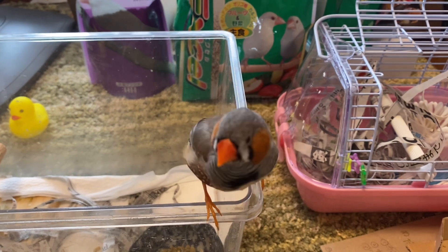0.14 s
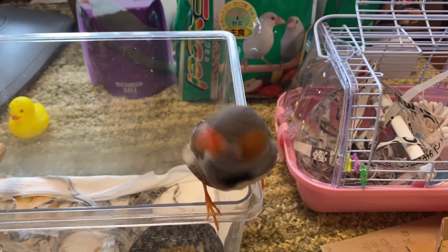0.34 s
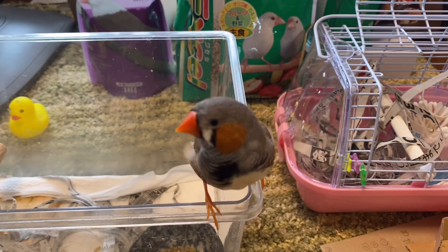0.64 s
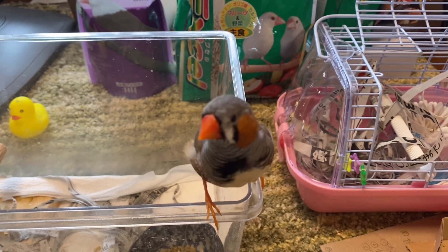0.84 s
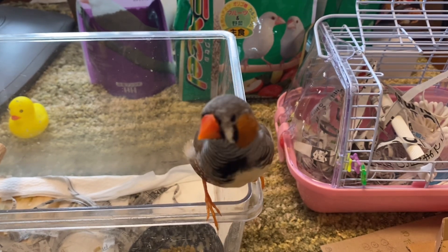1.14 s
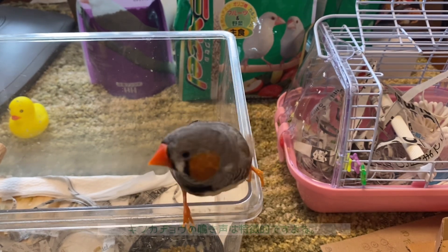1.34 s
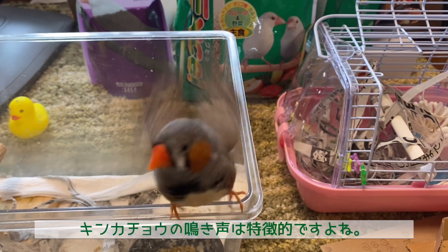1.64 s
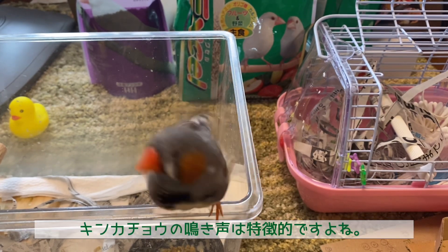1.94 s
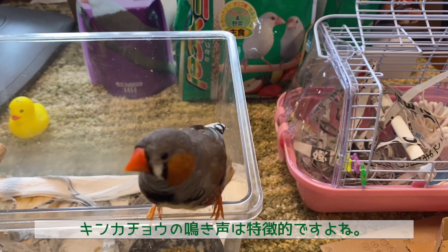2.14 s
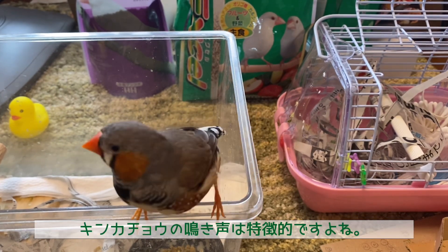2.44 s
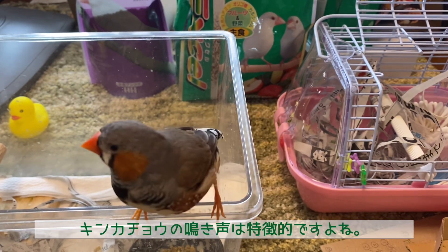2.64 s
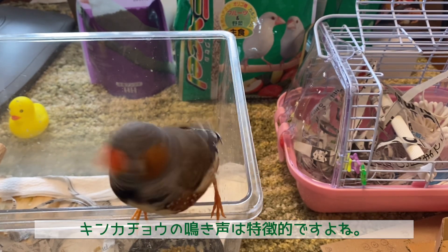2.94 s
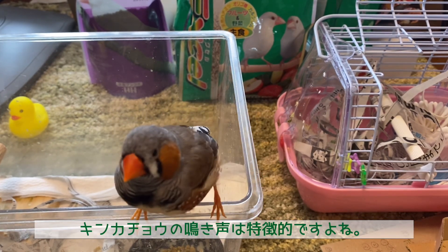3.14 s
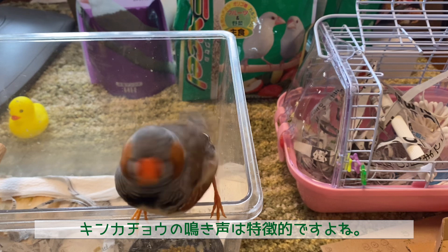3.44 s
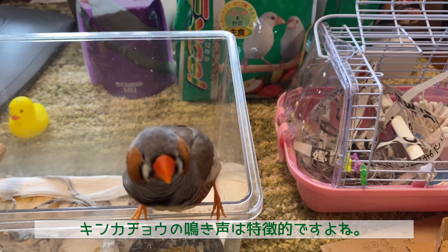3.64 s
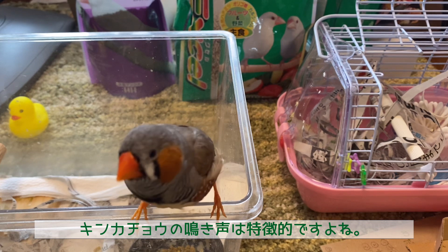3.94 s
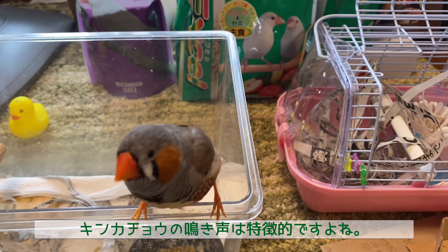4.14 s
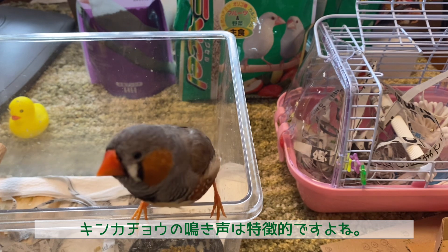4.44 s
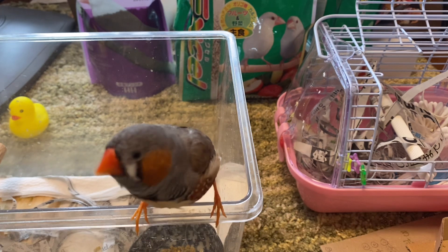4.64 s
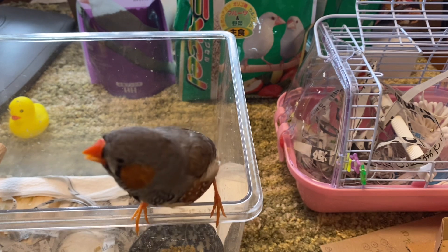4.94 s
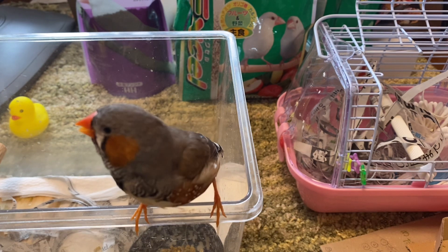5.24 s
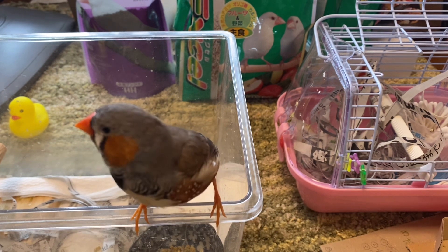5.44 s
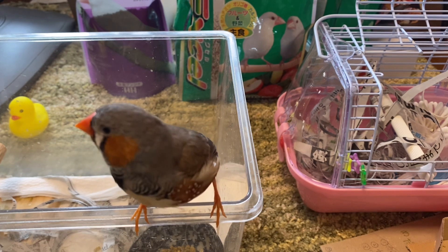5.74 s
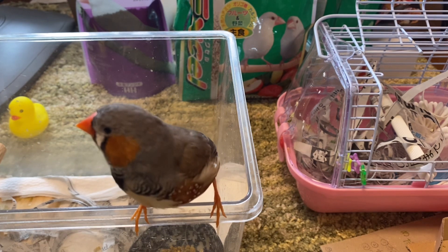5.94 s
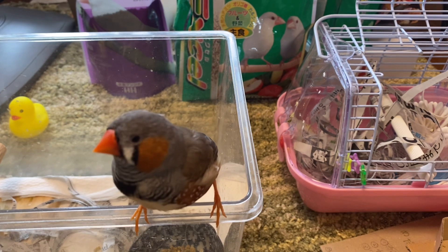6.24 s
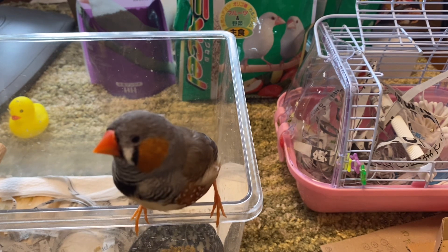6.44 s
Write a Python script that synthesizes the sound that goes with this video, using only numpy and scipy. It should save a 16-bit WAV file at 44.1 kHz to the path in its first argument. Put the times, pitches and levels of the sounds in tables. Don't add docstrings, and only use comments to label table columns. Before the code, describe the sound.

A pet finch very close to a stereo microphone in a quiet room with a low machine hum and faint hiss. A call's tail fades, a tiny buzzy note follows, then claws scratch and snap on a plastic tub with soft wing thumps. After a pause with faint feather ruffles come three thin spaced chirps, a short nasal note running into a loud long nasal call, and finally one more tiny buzz.

```python
import sys
import numpy as np
from scipy import signal
from scipy.fft import rfft, irfft, next_fast_len
from scipy.io import wavfile
from scipy.ndimage import uniform_filter1d

SR = 44100
rng = np.random.default_rng(int(sys.argv[2]) if len(sys.argv) > 2 else 0)


def gain_from_db(level_db):
    decades = np.asarray(level_db, float) / 20
    return 10 ** decades


def inscribe(sig):
    pcm = np.round(np.clip(np.atleast_2d(sig).T, -1, 1) * 32767)
    wavfile.write(sys.argv[1], SR, pcm.astype(np.int16))


N = 290619
TIME = np.arange(N) / SR
PADDED = next_fast_len(N)
BINS = np.maximum(np.fft.rfftfreq(PADDED, 1 / SR), 1)


def at_hz(points, hz, axis=1):
    points = np.array(points)
    return np.interp(np.log(hz), np.log(points[:, 0]), points[:, axis])


def rms_one(x):
    return x / np.sqrt(np.mean(x ** 2) + 1e-20)


def wobble(size, hz, count=1):
    sos = signal.butter(4, hz, fs=SR, output="sos")
    run_in = int(2 * SR / hz)
    drift = signal.sosfilt(sos, rng.standard_normal((count, size + run_in)))
    return np.squeeze(rms_one(drift[:, run_in:]))


def band(x, low_hz, high_hz):
    return signal.sosfilt(signal.butter(3, [low_hz, high_hz], "band", fs=SR, output="sos"), x)


# [hz, likeness]
PORT_LIKENESS = [(60, 1), (200, 0.8), (500, 0.13), (3000, .3), (4800, 0.15), (6900, 0.267), (10000, 0.27),
                 (15000, 0.37)]
# [hz, left_minus_right_db]
NOISE_PAN = [(40, 3), (100, -5.5), (200, -1), (500, -0.2), (4800, -0.5), (7000, 1)]


def stereo_noise(gain):
    mid, side = rfft(rng.standard_normal((2, PADDED)))
    alike = np.clip(at_hz(PORT_LIKENESS, BINS), 0, 1)
    pan = gain_from_db(at_hz(NOISE_PAN, BINS) / 2)
    mid, side = mid * np.sqrt(1 + alike), side * np.sqrt(1 - alike)
    both = irfft(gain * np.array([(mid + side) * pan, (mid - side) / pan]), PADDED)[:, :N]
    return both / np.sqrt(np.mean(both.mean(0) ** 2))


# [start_s, length_s, peak_db]
FEATHER_RUFFLES = [
    (0, .1, -80),
    (1.22, 0.066, -81),
    (2.863, .1, -71.5),
    (2.95, 0.052, -68),
    (3.05, 1.16, -77),
    (3.672, 0.23, -73),
    (5.0, 0.36, -76),
    (5.45, 0.86, -79.5),
    (6.45, .3, -77),
]
STILL_AIR_DB = -86


def stirred_air():
    rise_db_per_s, fall_db_per_s = 327, 110
    air_db = np.full(N, float(STILL_AIR_DB))
    for start, length, peak_db in FEATHER_RUFFLES:
        before_s = np.maximum(start - TIME, 0)
        after_s = np.maximum(TIME - start - length, 0)
        away_db = rise_db_per_s * before_s + fall_db_per_s * after_s
        air_db = np.maximum(air_db, peak_db - away_db)
    return air_db


# [hz, level_db_per_hz]
HUM_SPECTRUM = [(12, -61), (20, -28.5), (54, -3), (114, -4), (131, -3.5), (146, -36.5), (172, -10.5),
                (205, -20.5), (232, -15), (273, -20.5), (419, -32.5), (468, -23), (515, -31.5),
                (634, -30.5), (900, -30), (1170, -84), (1980, -120)]
# [hz, level_db_per_hz]
HISS_SPECTRUM = [(530, -39), (900, -15), (991, -5.5), (1100, -2), (1390, -9.5), (1930, -7), (2380, -10),
                 (2620, -3.5), (2940, -9), (3860, -13.5), (4720, -5), (5150, -12.5), (7280, -18),
                 (8330, -26.5), (9000, -73), (11700, -67.5), (19800, -120)]


def background():
    hum_db, hiss_db = -46.5, -65
    top_at_still_db, top_steeper = -104, 1.9
    air_db = stirred_air()
    hum_swell, hiss_swell = gain_from_db(.8 * wobble(N, 3, count=2))
    hum = gain_from_db(hum_db) * hum_swell * stereo_noise(gain_from_db(at_hz(HUM_SPECTRUM, BINS)))
    hiss = gain_from_db(hiss_db) * hiss_swell * stereo_noise(gain_from_db(at_hz(HISS_SPECTRUM, BINS)))
    white = stereo_noise(1)
    air = rms_one(band(white, 9700, 15000)) + 1.8 * rms_one(band(white, 3500, 7460))
    top_db = top_at_still_db + top_steeper * (air_db - STILL_AIR_DB)
    top = gain_from_db(top_db) * rms_one(band(white, 13500, 15000))
    return hum + hiss + gain_from_db(air_db) * air + top


def resonance(hz, centre_hz, width_hz):
    return 1 / (1 + 1j * (hz - centre_hz ** 2 / hz) / width_hz)


# [start_s, pitch_step_share, level_step_db]
REGISTER_SHIFTS = [
    (4.751, -0.038, 5),
    (4.882, .075, 1.5),
    (4.944, .05, 2.5),
    (5.141, -0.064, 2),
]
# [time_s, pitch_kink_share, length_s, extra_roughness (0-1), level_jump_db]
VOICE_CATCHES = [(4.699, -0.012, .005, 0.08, -2), (4.747, 0.063, 0.0023, .15, 4),
                 (4.881, 0.077, 0.0056, 0.37, 1.5), (4.966, 0.051, 0.0069, 0, 0),
                 (5.003, -0.02, 0.03, 0, 0.3), (5.019, 0.044, 0.0064, 0, 1), (5.045, 0.035, 0.005, 0, -1.5),
                 (5.075, .05, .006, 0, -3.5), (5.128, -0.0047, 0.005, 0, 1.5),
                 (5.182, 0.019, 0.0073, 0.06, 2.5), (5.201, 0.044, 0.0028, 0.7, 1.5)]
# [hz, level_db]
THROAT_COLOUR = [(400, 4.5), (800, 8), (1600, 5.5), (2400, 7.5), (3200, 8), (4000, 4.5), (4800, 5),
                 (5600, -4.5), (7000, -5.5), (9600, -2.5), (10500, -1), (12200, -7), (14200, -6),
                 (15600, -6)]
# [centre_hz, width_hz]
SIDE_RESONANCES = [(850, 770), (6900, 1750), (10500, 1200), (15500, 400)]


def note(rows, beak, roughness, sides_db, full_db):
    s, *columns = np.transpose(rows)
    span = slice(round(s[0] * SR), round(s[-1] * SR))
    t = TIME[span]
    pitch, level_db = [np.interp(t, s, c) for c in columns]
    for at, step, step_db in REGISTER_SHIFTS:
        shifted = (at > s[0]) * (1 + np.tanh((t - at) / 0.0005)) / 2
        pitch, level_db = pitch * (1 + step * shifted), level_db + step_db * shifted
    below_db = np.maximum(max(full_db, level_db.max()) - level_db, 0)

    beak_hz, width_hz, follows, opens, flare = beak
    flare = flare * np.exp((s[0] - t) / 0.0095)
    beak_hz = beak_hz * (pitch / np.median(pitch)) ** follows
    beak_hz = beak_hz * gain_from_db(-opens * below_db) * (1 + flare)

    rough = np.clip(roughness[0] + roughness[1] * below_db / 20, 0, .7)
    for at, kink, length, harsh, jump_db in VOICE_CATCHES:
        bump = np.exp(-((t - at) / length) ** 2)
        pitch = pitch * (1 + kink * bump)
        rough, level_db = rough + harsh * bump, level_db + jump_db * bump
    pitch = pitch * (1 + .005 * wobble(len(t), 170) + .03 * rough * wobble(len(t), 350))
    order = np.arange(1, 16500 // pitch.min() + 1)[:, None]
    hz = order * pitch

    effort = gain_from_db(-0.35 * below_db)
    drive = [-effort ** -1.4, -gain_from_db(20.5 * flare), effort, -effort]
    sides = gain_from_db(np.array(sides_db))[:, None] * drive
    tract = resonance(hz, beak_hz, width_hz) ** 2
    tract = tract + sum(g * resonance(hz, *mode) for g, mode in zip(sides, SIDE_RESONANCES))
    gain = gain_from_db(at_hz(THROAT_COLOUR, hz)) * tract * (hz < 20000)
    gain = gain * gain_from_db(1.8 * wobble(len(t), 70, count=len(order) + 1)[1:])

    blur = .7 * rough + .22 * np.minimum(order / 11, 1.1) ** 2.5
    slow, fast = wobble(len(t), 420, count=2 * len(order)).reshape(2, len(order), -1)
    pulses = np.exp(2j * np.pi * order * np.cumsum(pitch) / SR)
    wave = np.real(gain * (1 + blur * (slow + 1j * fast)) * pulses).sum(0)
    power = np.sum(np.abs(gain) ** 2 * (.5 + blur ** 2), axis=0)
    fade = np.clip(np.minimum(t - s[0], s[-1] - t) / .002, 0, 1)
    shimmer = gain_from_db(.6 * wobble(len(t), 120))
    return span, fade * shimmer * gain_from_db(level_db) * wave / np.sqrt(power)


# [time_s, pitch_hz, level_db]
TAIL_NOTES = [
    [(0, 454, -47), (.02, 485, -49.5), (.06, 499, -66)],
]
# [time_s, pitch_hz, level_db]
LEAD_IN_NOTES = [
    [(.307, 675, -56), (.311, 600, -39.5), (.321, 567, -37.5), (.33, 555, -39)],
    [(6.0205, 823, -44), (6.024, 642, -35.5), (6.029, 539, -32)],
]
# [time_s, pitch_hz, level_db]
BUZZ_NOTES = [
    [(.328, 530, -59), (.331, 504, -24.5), (.339, 517, -29), (.347, 455.6, -25), (.357, 476, -32.5),
     (.362, 497, -51)],
    [(6.024, 559, -43.5), (6.03, 507.5, -33), (6.043, 451.7, -25.5), (6.055, 468, -39), (6.06, 430, -31)],
]
# [time_s, pitch_hz, level_db]
WHISTLE_NOTES = [
    [(3.75, 3290, -65), (3.755, 4370, -27.5), (3.758, 4000, -39.5), (3.762, 4550, -23.5),
     (3.767, 5820, -23.5), (3.771, 6200, -21.5), (3.779, 5930, -32)],
    [(3.96, 2780, -54.5), (3.967, 4000, -28.5), (3.978, 5294, -22), (3.983, 5040, -47)],
]
# [time_s, pitch_hz, level_db]
SLUR_NOTES = [
    [(4.118, 1180, -44), (4.121, 1200, -26.5), (4.124, 1087, -28.5), (4.128, 1144, -30.5),
     (4.132, 1030, -29), (4.136, 1126, -28), (4.147, 1065, -30), (4.158, 947, -32), (4.172, 1030, -50)],
]
# [time_s, pitch_hz, level_db]
NASAL_NOTES = [
    [(4.67, 960, -43), (4.683, 1576, -27), (4.69, 1530, -22), (4.712, 1320, -22.5), (4.72, 1418, -27),
     (4.744, 1462, -27), (4.772, 1542, -32.5), (4.79, 1592, -27), (4.803, 1440, -35.5)],
    [(4.805, 1425, -48), (4.82, 1550, -49), (4.835, 1718, -41.5), (4.84, 1750, -62.5)],
]
# [time_s, pitch_hz, level_db]
LONG_CALLS = [
    [(4.853, 770, -40), (4.864, 746, -23.5), (4.904, 745, -20), (4.928, 690, -22.5), (5.07, 706.8, -23),
     (5.15, 648.3, -30), (5.215, 680.4, -32.5), (5.245, 765, -31), (5.274, 897, -54)],
]
# [resonance_hz, width_hz, pitch_follow_power, opening_share, onset_flare (0-1)]
KIND_BEAKS = [(2430, 630, .01, .01, .01), (2630, 1500, .01, .01, 0.07), (2900, 3200, .01, 0.021, 1),
              (5580, 3900, 0.2, .01, .01), (4180, 660, 0.61, .01, 0.1), (3945, 2240, .1, 0.084, 0),
              (4080, 1570, 0.23, 0.0202, 0.12)]
KIND_ROUGHNESS = [(.5, 0), (.35, 0), (.58, -.2), (.04, .15), (.26, .1), (.19, .4), (.04, .2)]
# [chest_db, nasal_db, treble_db, top_db]
KIND_SIDES = [(-30, -30, -35, -35), (-5, -6, -22, -17), (-9, -16, -20, -15), (-50, -18, -19.5, -13),
              (-50, -20, -24, -16), (-22, -28, -28, -16), (-21, -33, -16, -22)]


def finch():
    kinds = [TAIL_NOTES, LEAD_IN_NOTES, BUZZ_NOTES, WHISTLE_NOTES, SLUR_NOTES, NASAL_NOTES, LONG_CALLS]
    out = np.zeros(N)
    for notes, *voice in zip(kinds, KIND_BEAKS, KIND_ROUGHNESS, KIND_SIDES):
        full_db = max(db for rows in notes for *_, db in rows)
        for rows in notes:
            span, wave = note(rows, *voice, full_db=full_db)
            out[span] += wave
    return out


# [delay_s, level_db]
TUB_REFLECTIONS = [(.0019, -17), (.0043, -20)]


def with_echoes(x):
    return x + sum(gain_from_db(db) * np.interp(TIME - delay, TIME, x) for delay, db in TUB_REFLECTIONS)


# [start_s, peak_db, scratch_hz, treble_rel_db]
CLAW_CONTACTS = [(1.221, -49, 2780, -24), (1.248, -49, 1620, -16), (1.27, -53, 2600, -26),
                 (1.562, -36.5, 3470, -31), (1.587, -42.5, 2160, -2), (1.6044, -51, 1650, -26),
                 (1.629, -48, 3470, -3), (1.644, -48.5, 1830, -12), (1.655, -56, 1770, -14),
                 (1.681, -48, 3670, 2), (1.7054, -44.5, 6870, -3), (1.695, -50, 500, -25),
                 (1.7208, -37, 3200, -20), (1.735, -45.5, 1760, -19), (1.9444, -58, 5000, 0),
                 (1.9616, -33, 2900, -29), (1.979, -46.5, 1870, -14), (2.263, -60, 1820, -19),
                 (2.296, -54.5, 2600, -11), (3.495, -54.5, 1800, -20), (3.85, -51, 2500, -17),
                 (3.531, -56, 4580, 3), (3.6374, -63, 2620, 3), (3.6654, -51, 2500, -6),
                 (4.618, -53, 3250, -24)]


def hops():
    mean_db, mean_t60_s = -47, 0.074
    grains = rng.standard_normal((3, N)) * gain_from_db(3.5 * wobble(N, 400))
    treble, dull = band(grains[1], 10100, 15000), band(grains[2], 140, 960)
    out = np.zeros(N)
    for start, peak_db, hz, treble_db in CLAW_CONTACTS:
        span = slice(round(start * SR), round((start + .15) * SR))
        t = TIME[span] - start
        t60 = mean_t60_s * gain_from_db(0.25 * (mean_db - peak_db))
        dull_db = -49 + .35 * (peak_db - mean_db) - peak_db
        grain = grains[0, span]
        scratch = band(grain, hz / 1.81, hz * 1.33) + 0.39 * band(grain, 1080, 6600)
        burst = rms_one(scratch) + gain_from_db(treble_db) * rms_one(treble[span])
        burst = burst + gain_from_db(dull_db) * rms_one(dull[span])
        attack = np.clip(t / (0.11 * t60), 0, 1)
        out[span] += gain_from_db(peak_db - 1 - 60 * t / t60) * attack * burst
    return out


# [time_s, peak_db]
CLAW_SNAPS = [(1.588, -43), (1.681, -39), (1.7058, -42.5), (1.9635, -55), (2.2634, -51), (3.744, -50),
              (3.667, -56)]


def clicks():
    s, peak_db = np.transpose(CLAW_SNAPS)
    kicks = np.full(N, 1e-18)
    kicks[(s * SR).astype(int)] = gain_from_db(peak_db)
    envelope = signal.lfilter([1], [1, -gain_from_db(-60 / (0.017 * SR))], kicks)
    return envelope * rms_one(band(rng.standard_normal(N), 3700, 21000))


# [start_s, peak_db, pitch_hz]
WING_THUMPS = [
    (1.646, -33.5, 46.2),
    (1.677, -30, 48.4),
    (1.698, -42, 46),
    (1.69, -46, 307),
    (1.71, -53, 481),
    (1.965, -42.5, 302),
    (4.85, -42.5, 213),
]
# [start_s, peak_db, pitch_hz]
WALL_KNOCKS = [
    (3.373, -53, 580),
    (3.496, -45, 695),
    (3.67, -40, 716),
    (4.618, -45.5, 966),
]


def tub():
    out, t = np.zeros(N), TIME[:SR // 3]
    for events, t60 in [(WALL_KNOCKS, .05), (WING_THUMPS, .2)]:
        for s, peak_db, hz in events:
            start = round(s * SR)
            out[start:start + len(t)] += gain_from_db(peak_db - 60 * t / t60) * np.sin(2 * np.pi * hz * t)
    return out


# [hz, left_minus_right_db, right_lag_rad]
PORT_DIFFERENCE = [(198.6, 11, 1.7), (794, 10.5, 0.56), (1550, 7.5, 2), (2400, 10.5, 1.1),
                   (3100, 4.5, 0.16), (4000, 2, 0.32), (4800, 6, 0.76), (5700, 10.5, 0.9), (6750, 0, 0.85),
                   (9800, 0.5, 1.9), (15000, 0.2, 1.1)]


def at_ports(x):
    split = gain_from_db(at_hz(PORT_DIFFERENCE, BINS)) * np.exp(1j * at_hz(PORT_DIFFERENCE, BINS, axis=2))
    right = 2 * rfft(x, PADDED) / (1 + split)
    return irfft(np.array([right * split, right]), PADDED)[:, :N]


def room(x):
    t60_s, level_db = 0.2, -21.5
    t = TIME[:SR // 2]
    tail = rng.standard_normal((2, len(t))) * gain_from_db(-60 * t / t60_s) * np.clip(t / 0.0011, 0, 1)
    tail = band(tail, 300, 5800)
    tail = tail / np.sqrt(np.sum(tail ** 2) / 2)
    return gain_from_db(level_db) * signal.fftconvolve(x[None], tail, axes=1)[:, :N]


def ducking(near):
    duck_db, from_db, window_s = -1.5, -32, 0.027
    power = uniform_filter1d(near ** 2, size=round(window_s * SR))
    level_db = 10 * np.log10(np.maximum(power, 1e-12))
    return gain_from_db(duck_db * np.clip((level_db - from_db) / 10, 0, 1))


def scene():
    near = with_echoes(finch()) + hops() + clicks()
    return at_ports(near) + room(near) + tub() + ducking(near) * background()


def low_pass(x):
    return signal.sosfilt(signal.butter(12, 16980, fs=SR, output="sos"), x)


# [low_hz, high_hz]
TREBLE_GAPS = [(8300, 9450), (12450, 13900)]


def record(dry):
    for edges in TREBLE_GAPS:
        dry = signal.sosfilt(signal.ellip(4, 1, 32, edges, "bandstop", fs=SR, output="sos"), dry)
    dry = signal.sosfilt(signal.ellip(10, 1, 55, 15900, fs=SR, output="sos"), dry)
    return low_pass(dry)


dry = scene()
out = record(dry)
inscribe(out)
```